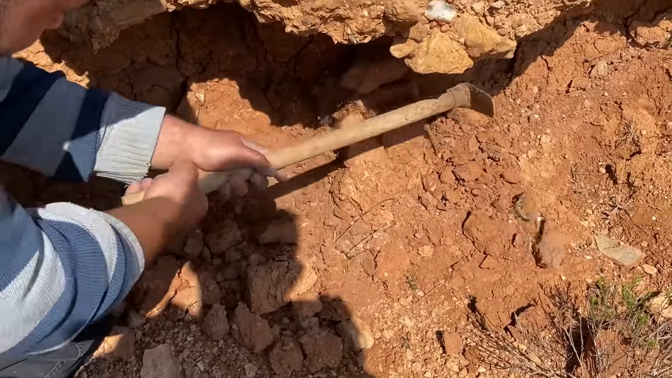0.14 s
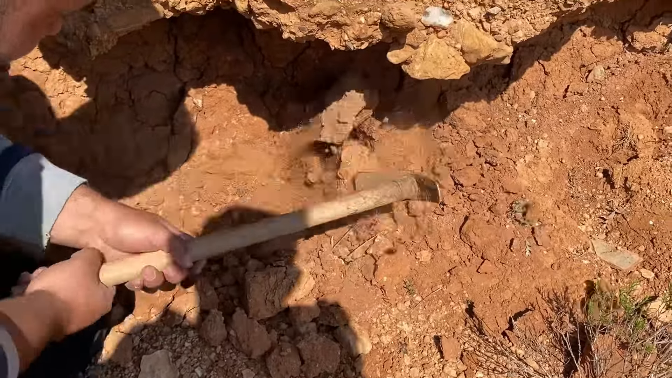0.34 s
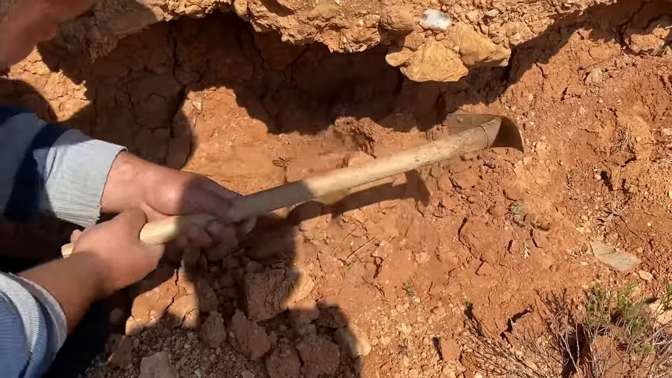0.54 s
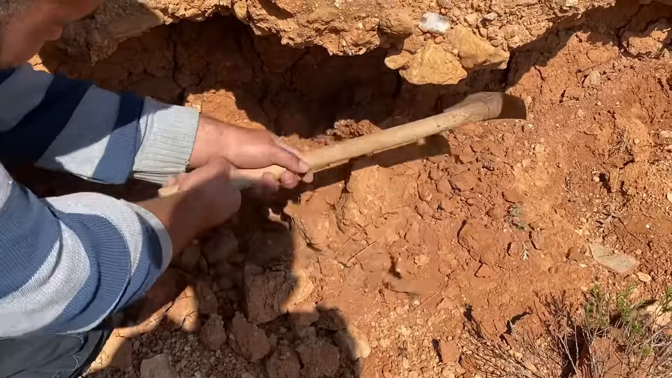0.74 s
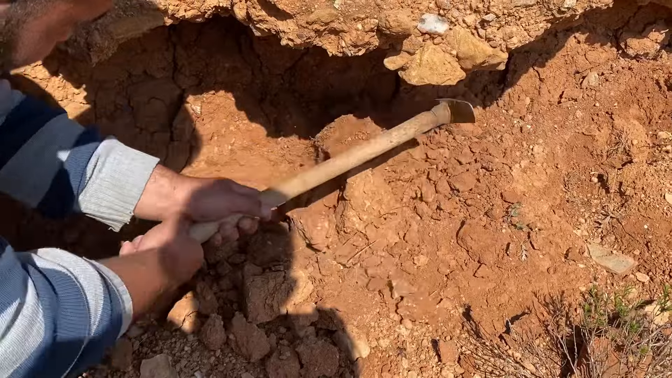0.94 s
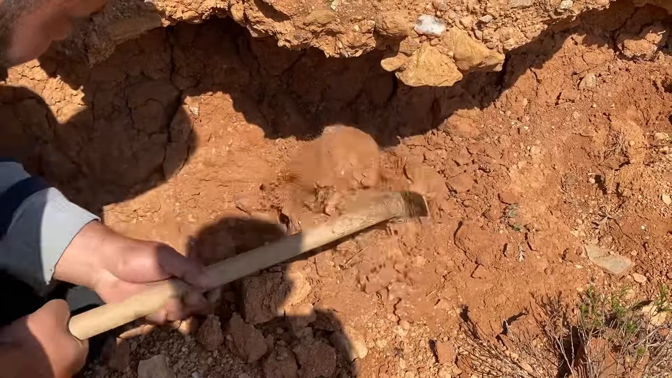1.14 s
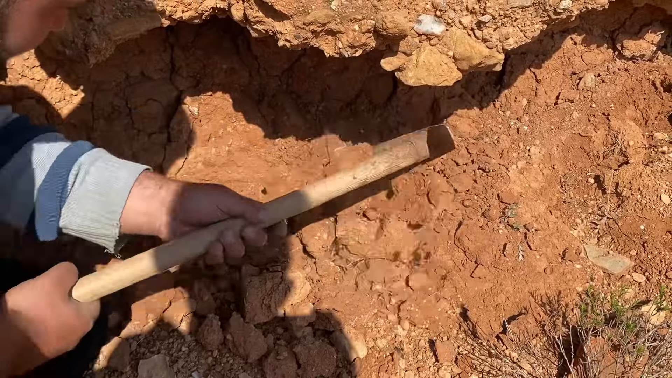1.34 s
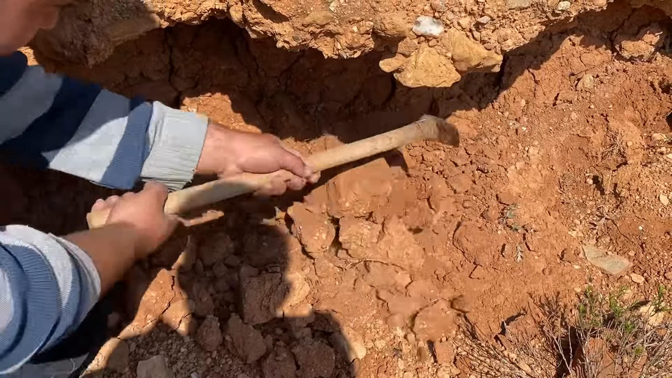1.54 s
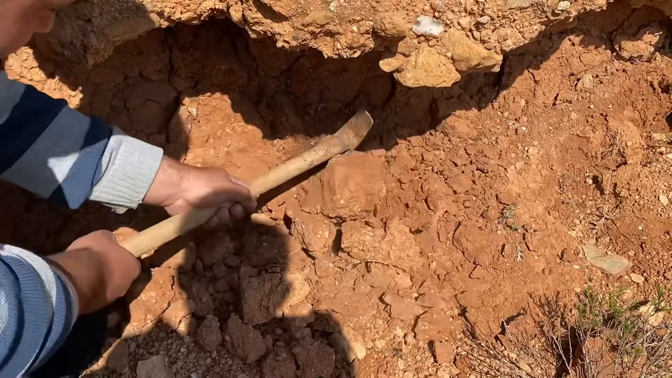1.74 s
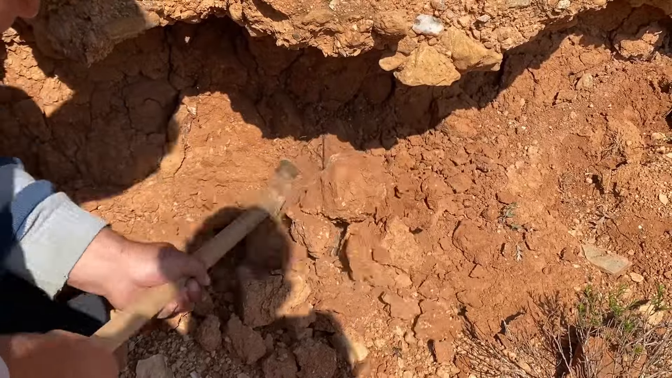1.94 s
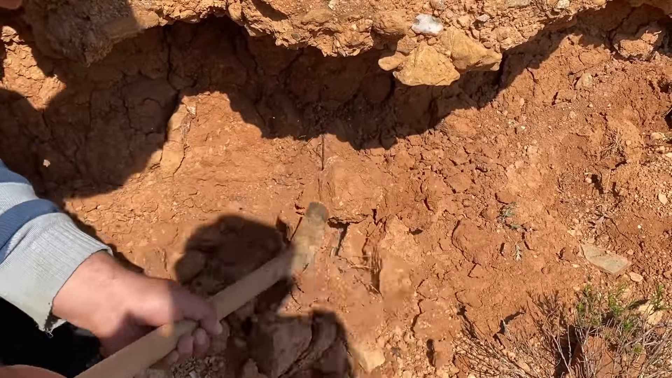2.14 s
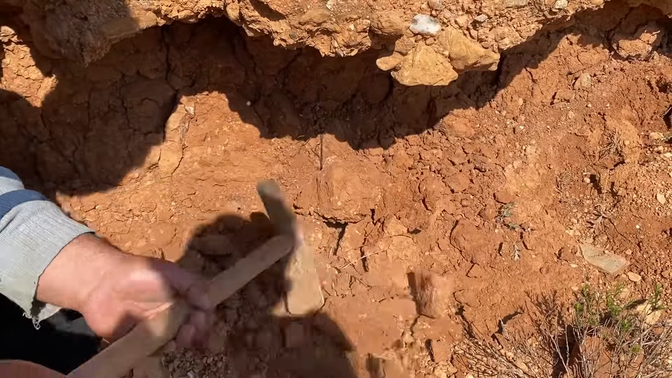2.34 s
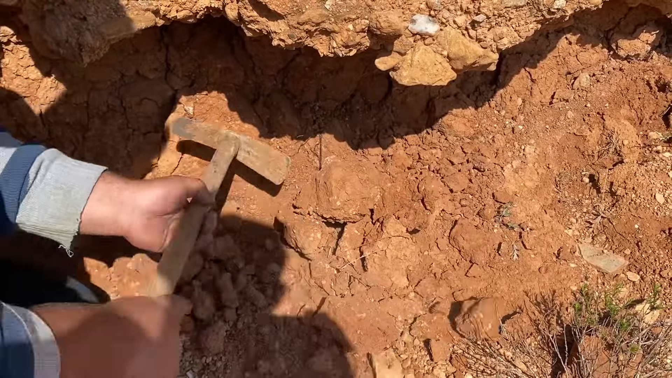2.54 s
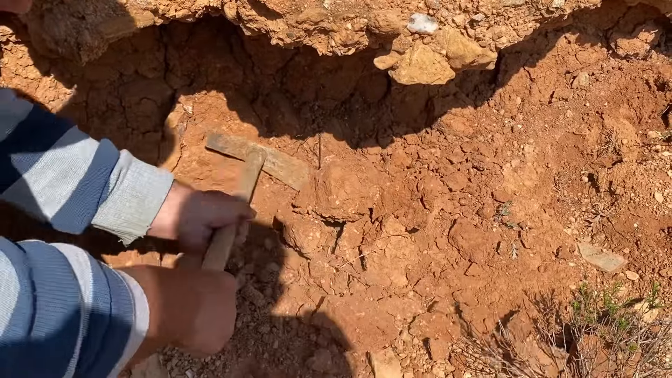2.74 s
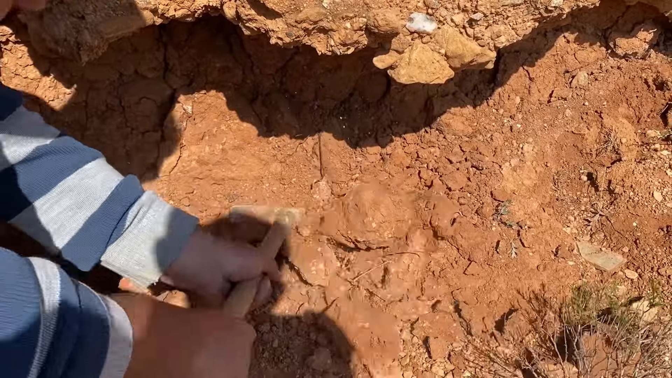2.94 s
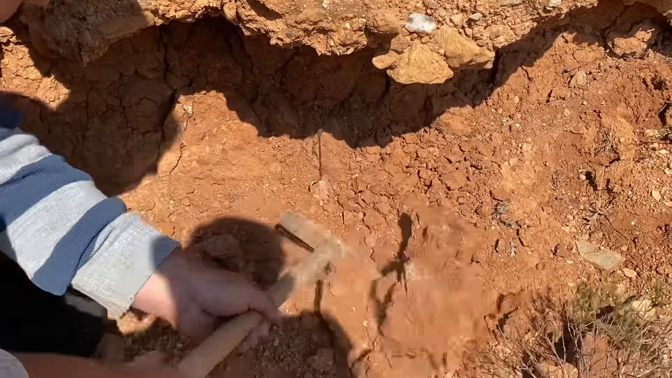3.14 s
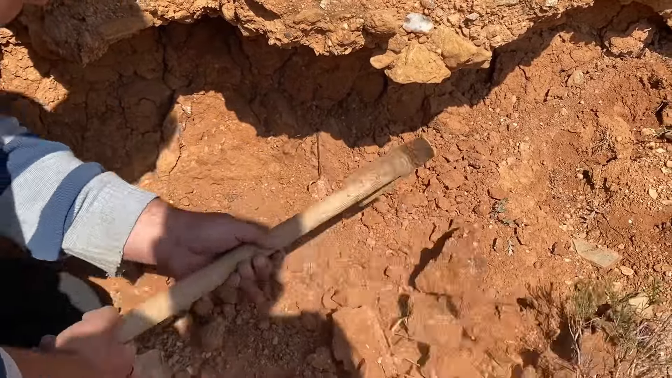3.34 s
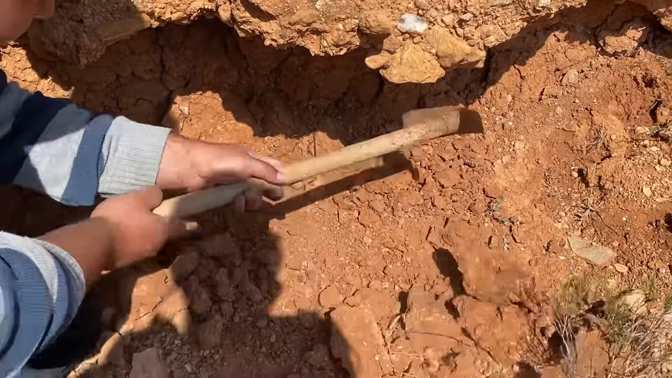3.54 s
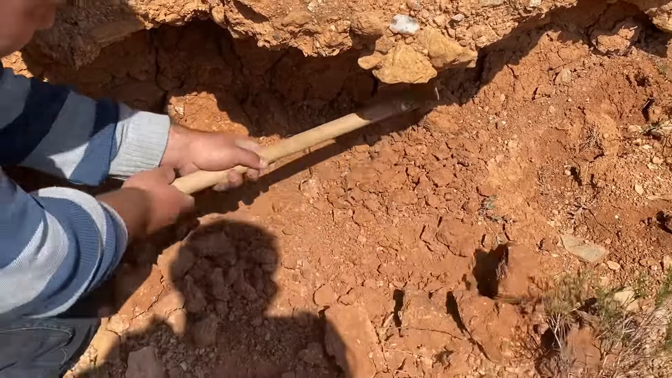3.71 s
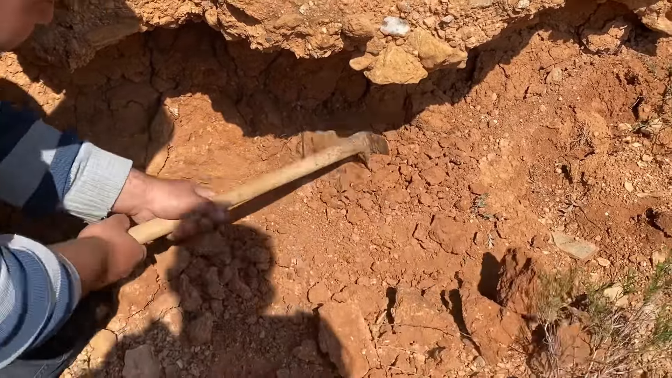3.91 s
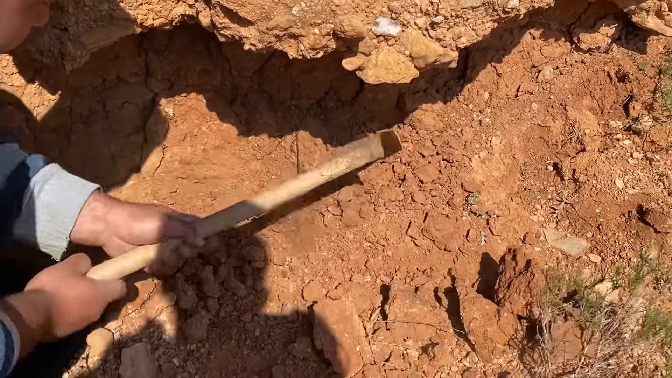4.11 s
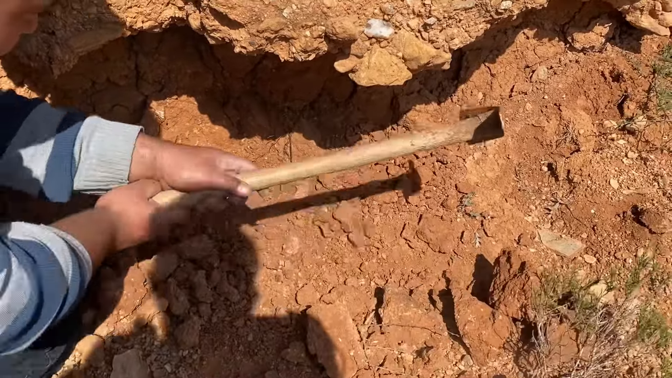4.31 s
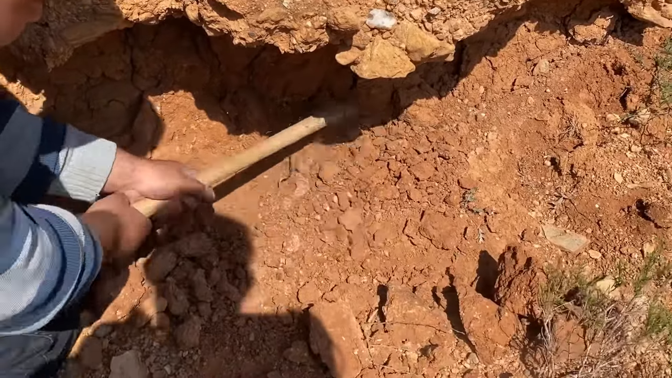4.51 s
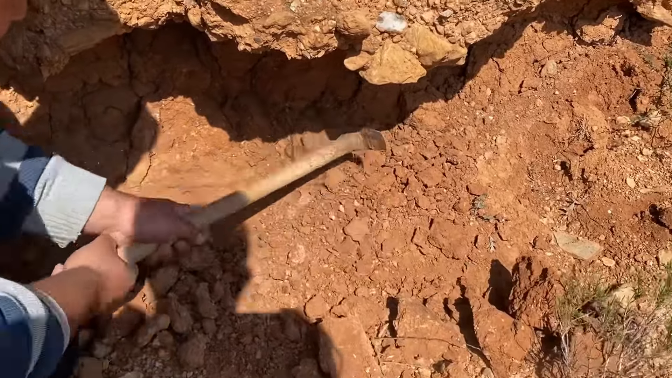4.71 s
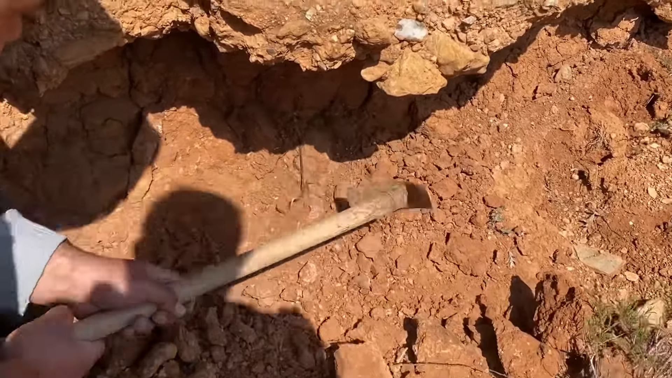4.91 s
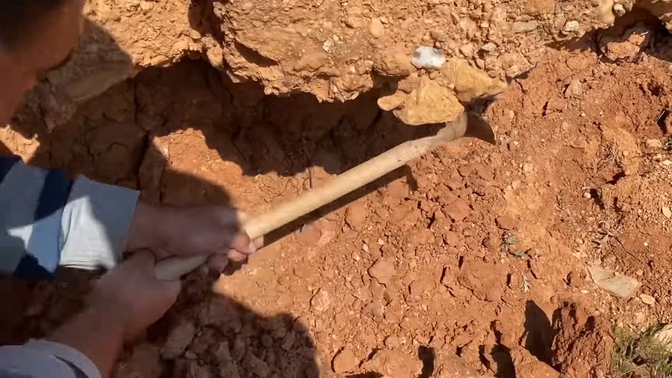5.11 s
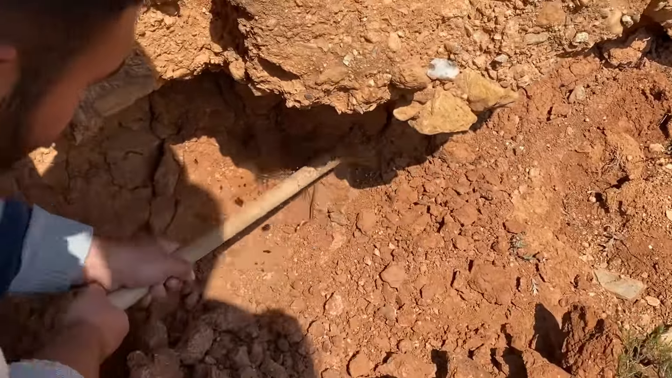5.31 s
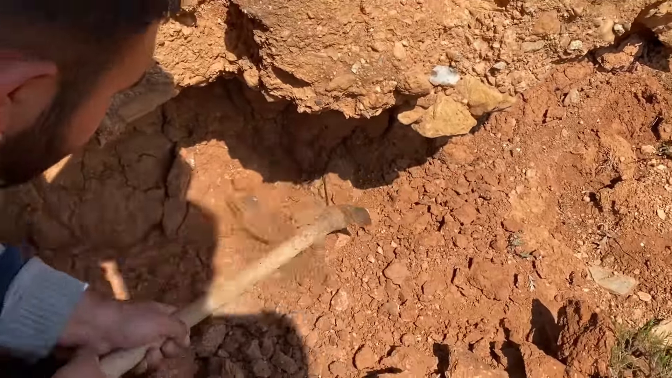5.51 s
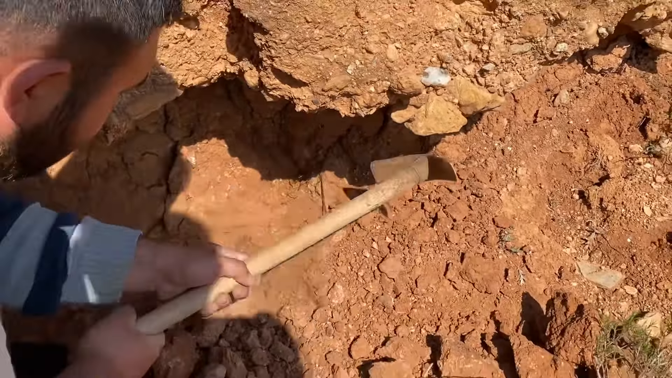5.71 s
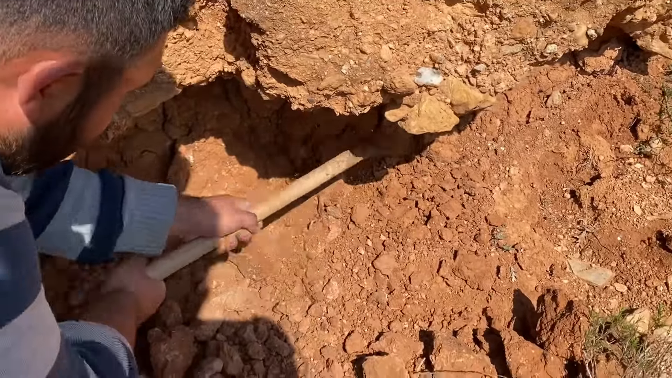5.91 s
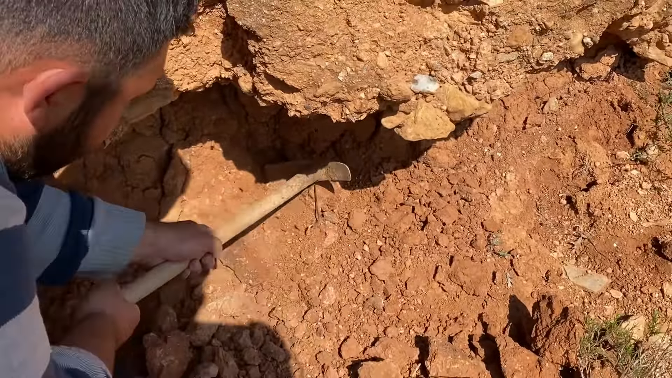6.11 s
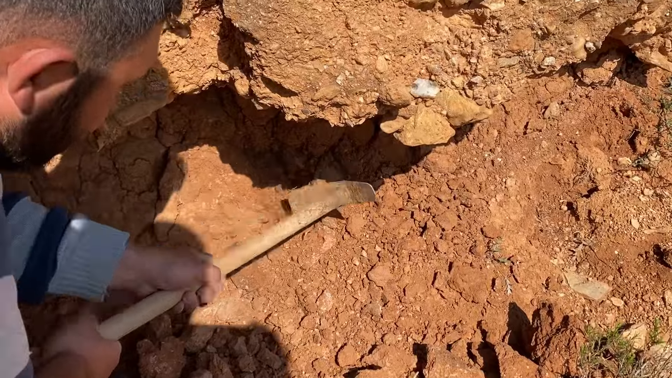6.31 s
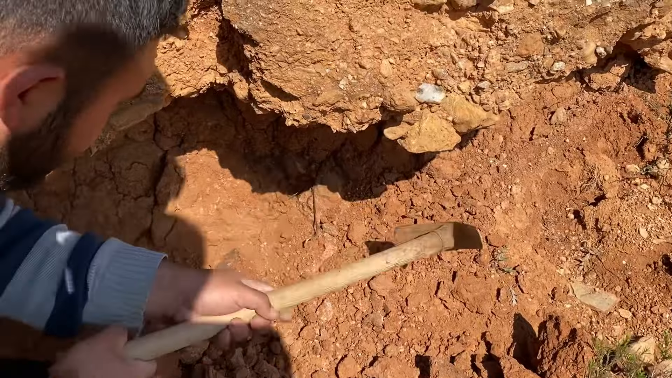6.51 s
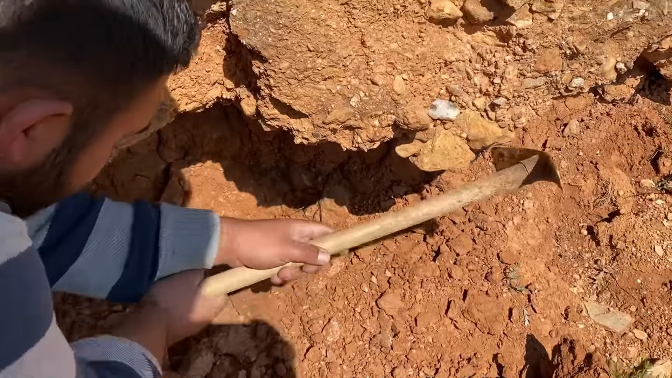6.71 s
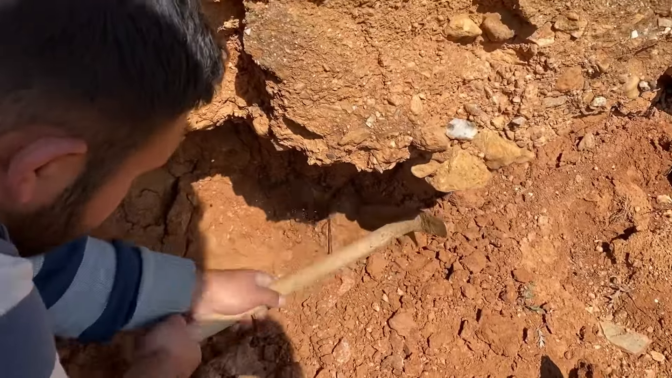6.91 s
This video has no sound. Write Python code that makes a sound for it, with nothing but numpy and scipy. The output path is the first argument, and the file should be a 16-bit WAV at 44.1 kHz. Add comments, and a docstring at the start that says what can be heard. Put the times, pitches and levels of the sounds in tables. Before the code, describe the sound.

Close up in the open air, an iron digging blade with a wooden handle chops unevenly into stony soil. Stones give short, damped clinks and cracks, the ground thumps, and gritty scrapes follow as the tool is pulled back. Midway the blows ease while crumbs and dust slide down the slope with a soft rumble, then harder strikes return and continue to the end.

```python
"""Mattock in a stony bank.

A short mattock chops into dry earth and is dragged back through it, close to two microphones.
Each stone rings the iron blade and knocks the handle; grit rubs the tool on the drag.
The ground thuds and loose earth trickles down the slope over a low rumble, like rolling clods."""
import sys
import numpy as np
from scipy import signal
from scipy.fft import rfft, irfft, next_fast_len
from scipy.io import wavfile
from scipy.ndimage import map_coordinates

SR = 44100
rng = np.random.default_rng(int(sys.argv[2]) if len(sys.argv) > 2 else 0)


def inscribe(sig):
    """Save sig as 16-bit PCM at rate SR to the path in sys.argv[1].

    A 1-D sig is mono; a 2-D sig holds one channel per row.
    Samples are clipped to [-1, 1] before scaling.
    """
    pcm = np.round(np.clip(np.atleast_2d(sig).T, -1, 1) * 32767)
    wavfile.write(sys.argv[1], SR, pcm.astype(np.int16))


N = 306495

# Levels in the tables are before the trims in the functions.
# Blade on stone. Each row: start in seconds, level in dB, handle, crack and edge in dB re blade,
# left minus right in dB, blade pitch in Hz, handle pitch in Hz, force T60 in seconds.
STONE_HITS = [(0.0266, -13, -9.5, -2.5, -20, 1, 2400, 503, 0.031),
              (0.1448, -25.5, -5, -16, -12, 0, 3300, 1380, 0.018),
              (0.165, -26, -9.5, -3, -28, -1, 2540, 1270, 0.031),
              (0.192, -23.5, -14, 0, -20, -3, 3280, 1090, 0.018),
              (0.2772, -17.5, -15.5, -8.5, -18, -1, 2120, 1330, 0.042),
              (0.3488, -39, -5.5, -17, -13, 1, 2530, 603, 0.022),
              (0.4907, -32.5, -10, -3, -21, -1, 1950, 510, 0.039),
              (0.5052, -34, -10, -14, -24, -1, 2190, 490, 0.1),
              (0.5402, -39, 0, -18, -8, 0, 1820, 510, 0.02),
              (0.5624, -40, -6, -15, -5, 1.5, 3700, 610, 0.044),
              (0.624, -47.5, 2, -17, -19, 1, 3420, 516, 0.0096),
              (0.7789, -7.5, -13, -27, -20, 0.5, 2660, 684, 0.019),
              (0.8393, -41, -8.5, 5, -9, 1, 2060, 560, 0.025),
              (1.0335, -31, -10, 3, -22, 0, 3210, 1430, 0.015),
              (1.05, -24.5, -8.5, 2.5, -30, -1, 2000, 1130, 0.034),
              (1.3279, -43, -26, -6, -2, 0.5, 1920, 361, 0.014),
              (1.4186, -37, -8, -6, -15, 1, 2200, 383, 0.023),
              (1.5046, -43.5, 1.5, 2, -12, 0, 2110, 353, 0.015),
              (1.5746, -18, -15, -11, -40, 0, 1930, 660, 0.026),
              (1.6062, -26.5, -5.5, -9, -22, 1, 2140, 670, 0.06),
              (1.6576, -25.5, -15, -22, -16, -1, 2580, 977, 0.027),
              (1.726, -24.5, -10, -24, -29, 0, 2080, 594, 0.012),
              (1.7597, -28, -11, -25, -27, 1, 3020, 1130, 0.022),
              (1.8071, -21.5, -9, -26, -14, 1, 3050, 1080, 0.038),
              (1.8312, -27, -2.5, -22, -33, 2, 2750, 620, 0.032),
              (1.9048, -27, -2.5, -17, -27, 9, 2780, 1300, 0.014),
              (2.0822, -34, -10, -18, -16, 7, 2150, 1010, 0.024),
              (2.2393, -36, -5.5, -24, -26, 7, 1700, 1350, 0.02),
              (2.3179, -35, -19, -10, -12.5, -2, 2060, 353, 0.054),
              (2.6682, -25.5, -14, -20, -27, -1, 1640, 625, 0.02),
              (2.7603, -28.5, 0, -18, -9.5, 1, 2800, 750, 0.026),
              (2.843, -18, -20, -27, -15, 1.5, 3270, 487, 0.055),
              (2.9093, -26.5, -26, -9, -20.5, 1, 1930, 598, 0.046),
              (3.161, -34, -14, 1, -8, -1, 2160, 1100, 0.018),
              (3.2586, -34, -9, -19, -23, -4, 2160, 1100, 0.017),
              (3.2881, -31.5, -8, -14, -7, 1, 1920, 401, 0.02),
              (3.5573, -28, -8.5, -4, -24, -2, 1680, 367, 0.024),
              (3.653, -30.5, -8, -7, -16, -2, 1760, 1210, 0.021),
              (3.7468, -21.5, -15, -2, -12, 2, 3230, 473, 0.019),
              (3.7504, -12, -11, -19, -18, 0, 2010, 696, 0.022),
              (3.7683, -17.5, -29, -22, -27, -1, 2540, 1360, 0.0092),
              (3.8394, -24, -7, -32, -13, 2, 3000, 1070, 0.047),
              (3.8855, -16.5, -8, -16, -10.5, 2, 3050, 1130, 0.01),
              (3.9165, -15, -15.5, -21, -7, 2, 3260, 840, 0.014),
              (3.9339, -25.5, -8, -17, -10, 2, 3020, 1250, 0.028),
              (3.9698, -21.5, -7, -26, -28, 2, 5100, 472, 0.027),
              (4.1859, -42.5, 4, -24, 3, -1, 2140, 420, 0.017),
              (4.433, -40, 6, -22, -21, -2, 1840, 353, 0.027),
              (4.4577, -2.5, -11.5, -42, -19, 1, 2730, 510, 0.011),
              (4.6002, -24, -11, -12, -0.5, 1, 3100, 1280, 0.0092),
              (4.6321, -29, -2, -14, -12.5, 1, 3120, 1060, 0.052),
              (4.6676, -24, -4.5, -18, -9, 0, 2840, 635, 0.012),
              (4.7458, -34.5, -0.5, 6.5, -29, 3, 2550, 1300, 0.015),
              (4.8758, -45, -3, -15, -12, -3, 1690, 586, 0.063),
              (4.95, -49.5, 0, -17, 2, 0, 1860, 670, 0.027),
              (5.0394, -48, 3, -8.5, -9, -5, 1500, 360, 0.081),
              (5.2052, -9.5, -9.5, -13, -12.5, 0.5, 1970, 655, 0.028),
              (5.2064, -14.5, -14, -12, -27, 1, 2970, 1400, 0.017),
              (5.2395, -30.5, -5, -3, -8, -1, 3250, 666, 0.019),
              (5.2867, -22, -15, -1, -12, 0, 2060, 353, 0.0086),
              (5.3155, -26, -33, -19, -6.5, 1, 2380, 1200, 0.017),
              (5.3658, -18, -18, -36, -4.5, 0, 3000, 1250, 0.014),
              (5.3924, -21, -10.5, -27, -11, 1, 2540, 1250, 0.035),
              (5.4209, -20, -14, -31, -33, 2, 2460, 1260, 0.016),
              (5.442, -20, -9, -32, -36, 2.5, 2420, 764, 0.036),
              (5.7739, -10, -5.5, -9, -19, -0.5, 3300, 1300, 0.025),
              (5.8186, -48, -11, -10, -10, 0.5, 2780, 810, 0.016),
              (5.846, -45, 0, -4, -0.5, -1, 1920, 382, 0.019),
              (5.9357, -14.5, -9, -16, -21, 0.5, 2240, 690, 0.032),
              (5.9577, -20.5, 1.5, -32, -18, 2, 2070, 323, 0.02),
              (6.126, -34.5, -11, -11, -35, 1, 3300, 606, 0.012),
              (6.1687, -39.5, -3.5, -1, -24, 1, 2300, 546, 0.024),
              (6.1852, -32, -8, -0.5, -36, 0, 2080, 436, 0.017),
              (6.2065, -34, -7, -8, -33, 3, 2030, 1240, 0.037),
              (6.351, -40.5, -9, -14, -30, -7, 5000, 482, 0.015),
              (6.6605, -15, -5, -8, -16, 0.5, 2250, 1220, 0.044),
              (6.778, -43.5, 1.5, -24, -25, -1, 1880, 597, 0.019),
              (6.8176, -40, 3, -28, -24, -3, 1780, 340, 0.018),
              (6.7952, -13, -9, -2.5, -4.5, 0, 2700, 1380, 0.025),
              (6.9052, -28, -12, -46, -54, -1, 2360, 630, 0.047)]
# Tool resonances. Each row: frequency in Hz, width before damping in Hz, gain in dB.
BLADE_MODES = [(1590, 140, -11.5), (2064, 190, -0.5), (2500, 190, -1.5), (2664, 397, -3), (2973, 300, -1.5),
               (3236, 124, 0), (4340, 25, -5.5), (4996, 59, -2.5), (5610, 26, -3.5)]
EDGE_MODES = [(6345, 170, 0), (7800, 49, 5), (9920, 99, 6), (10300, 51, -11), (11450, 71, -16),
              (12300, 97, -9), (12230, 82, 4.5), (13800, 25, -14), (14330, 100, -11.5)]
HANDLE_MODES = [(287, 310, 1), (531, 194, -1), (632, 116, -2), (852, 74, -1.5), (1085, 111, -1),
                (1367, 130, 1)]
# Blows and clods on the ground. Each row: start in seconds, level in dB, nominal pitch 10 ms in, in Hz,
# T60 in seconds, scuff in dB re swing.
THUDS = [(0.027, -32.5, 75, .1, -28), (0.152, -36.5, 215, 0.067, -20), (0.202, -30.5, 180, 0.088, -18),
         (0.27, -35.5, 227, 0.13, -20), (0.363, -42.5, 146, 0.12, -20), (0.498, -40, 73, 0.16, -10),
         (0.623, -43, 160, .11, -6), (0.739, -37, 68.5, 0.048, -20), (0.777, -29, 212, 0.069, -16),
         (1.061, -35, 234, 0.092, -27), (1.187, -24, 114, 0.076, -36), (1.233, -31, 85, 0.12, -19),
         (1.292, -27.5, 113, 0.034, -15), (1.395, -36, 199.5, 0.13, -14), (1.468, -37, 83.4, .1, -30),
         (1.5, -38, 116, .057, -13), (1.563, -31, 94, 0.098, -24), (1.601, -34.5, 245, 0.067, -15),
         (2.313, -37, 96, .078, -20), (2.626, -35, 71, .07, -33), (2.664, -39.5, 264, 0.06, -18),
         (2.759, -36, 83, .07, -20), (3.142, -39, 85, 0.074, -14), (3.257, -35.5, 102, 0.1, -8),
         (3.462, -34.5, 119, 0.075, -26), (3.683, -36.5, 86.6, .07, -20), (3.751, -22.5, 159, 0.076, -15),
         (3.966, -31.5, 184, 0.067, -21), (4.03, -30.5, 91, 0.082, -3), (4.133, -32, 75, .089, -11),
         (4.15, -30, 71, 0.11, -4.5), (4.179, -36.5, 165, 0.11, 1), (4.221, -37.5, 125, 0.11, -32),
         (4.373, -32.5, 119, 0.068, -12), (4.459, -19.5, 130, 0.082, -4.5), (4.586, -37, 217, 0.12, -20),
         (4.745, -37, 244, .075, -18), (4.794, -36, 123, .16, -28), (5.164, -39.5, 148, 0.058, -16),
         (5.209, -19.5, 235, 0.09, -24), (5.417, -32.5, 221, 0.086, -24), (5.584, -41, 132, .07, -10),
         (5.773, -29, 254, 0.052, 1), (5.848, -41.5, 79.5, 0.1, -17), (5.908, -40, 90, .07, -33),
         (5.938, -31, 143, 0.22, -28), (5.957, -22, 235, 0.12, -20), (6.357, -42, 88, 0.068, -24),
         (6.603, -31, 81, 0.21, -42), (6.643, -19.5, 78, 0.097, -33), (6.664, -26, 119, 0.057, -10),
         (6.739, -48, 95, 0.054, -25), (6.802, -15, 134, 0.085, -13), (6.908, -33, 74, 0.16, -16)]
# Drag strokes. Each row: start and end in seconds, level in dB, change over the stroke in dB,
# edge and handle in dB re blade.
SCRAPES = [(0.13, 0.164, -43.5, 6, -4.5, -2.5), (0.2, 0.223, -39, 7, -1.5, -6),
           (0.294, 0.291, -43.5, -24, -4, 10.5), (0.98, 1.002, -52, 6, -17, 1.5),
           (1.069, 1.13, -36, -15, -3, -4.5), (1.6, 1.62, -39.5, -14, -7, -3),
           (1.675, 1.793, -41.5, -9, -3.5, 1), (1.802, 1.878, -37.5, -9, -22, 2),
           (1.916, 2.014, -38, -10.5, -12, -0.5), (2.102, 2.139, -41.5, -2.5, -6, -2),
           (3.556, 3.574, -44, 3.5, -5, 3), (3.658, 3.692, -47, -11, -4, 5.5),
           (3.776, 3.872, -39.5, 2.5, -10, 2), (3.89, 3.987, -38, -9, -2, -0.5),
           (4.142, 4.185, -58, 3, 3, 5.5), (4.48, 4.63, -42.5, -2.5, -7, 0),
           (4.644, 4.729, -40, -10, -1.5, 6), (5.25, 5.335, -37, -15, -4.5, -1.5),
           (5.351, 5.458, -37, -6.5, -4, -1.5), (5.481, 5.499, -49, 2, -3, -2),
           (5.567, 5.586, -55.5, 7, -3, 1), (5.968, 6.01, -46, 9.5, -5, 2),
           (6.114, 6.224, -60.5, 7, -4.5, 2)]
# Running earth. Each row: time in seconds, grit, crumb and dust levels in dB.
TRICKLE_LEVELS = [(0.0, -55, -71, -72), (0.43, -57, -59, -60), (0.6, -62.5, -64, -66),
                  (0.79, -63, -63, -81), (1.14, -54, -54, -53.5), (1.45, -61.5, -80, -68),
                  (1.6, -61, -70, -84), (1.78, -46, -52.5, -61), (2.05, -54, -52, -60.5),
                  (2.69, -51.5, -57.5, -54.5), (2.92, -50, -46.5, -59), (3.16, -50, -50, -61),
                  (3.35, -50.5, -54.5, -47), (3.62, -50.5, -73, -56.5), (3.81, -49, -56.5, -56),
                  (3.95, -56.5, -46.5, -61), (4.2, -60, -57.5, -60), (4.41, -63, -52.5, -59),
                  (4.59, -52, -56, -72), (4.76, -63, -63.5, -69), (4.99, -63.5, -58.5, -68),
                  (5.25, -60, -64, -87), (5.38, -54, -49, -63), (5.55, -64, -61, -69.5),
                  (6.48, -67.5, -62.5, -88), (6.95, -63.5, -59, -78)]
# Low rumble. Each row: time in seconds, level in dB.
RUMBLE_LEVELS = [(0.0, -58), (0.21, -48), (0.31, -55.5), (0.83, -62), (1.06, -60), (1.35, -44.5),
                 (1.55, -46), (1.97, -57.5), (2.84, -51.5), (3.31, -42.5), (3.56, -51.5), (3.74, -50.5),
                 (3.91, -46.5), (4.72, -55.5), (4.9, -58.5), (5.13, -61), (5.36, -48), (5.57, -60),
                 (5.79, -67), (5.94, -53), (6.41, -61.5), (6.6, -49.5), (6.76, -45), (6.95, -50)]
# Noise spectra. Each row: frequency in Hz, gain in dB.
CRACK_SPECTRUM = [(800, -55), (2500, -5), (4000, 7.5), (6000, -5.5), (10000, -4.5), (15000, -23)]
GRIT_SPECTRUM = [(300, -9), (1000, -0.5), (2500, 0), (5000, -2), (8000, -7.5), (11000, -9.5), (17000, -49)]
CRUMB_SPECTRUM = [(100, -17), (250, 0.5), (600, 4), (1200, -5.5), (3000, -15)]
DUST_SPECTRUM = [(3000, -48), (7000, -15), (10000, -3), (14000, -4), (17000, -9)]
RUMBLE_SPECTRUM = [(20, -39), (40, 0), (65, 2), (110, -4), (200, -7), (400, -19.5), (900, -82)]
# Two fixed treble dips, near 8 and 13 kHz. Each row: centre in Hz, width in Hz, depth from 0 to 1.
TREBLE_DIPS = [(8100, 150, 0.42), (12900, 2730, 0.41)]
# Phase between microphones. Each row: frequency in Hz, left lead in radians.
MIC_LEAD = [(0, -0.5), (780, 0.5), (1720, 0.56), (2930, 0.74), (6800, 1), (8700, -4), (9730, -5.5),
            (10700, -6.5), (11600, -9), (12800, -10.5), (13300, 1), (14600, -21), (15200, -21.5),
            (16400, -6)]
# Balance between microphones. Each row: frequency in Hz, left minus right in dB.
MIC_BALANCE = [(60, 3.5), (110, 1), (200, 0.5), (380, 0.5), (700, 0.5), (1290, 4.5), (2380, 1), (4400, 4),
               (8120, 1.5), (15000, 0.5)]


def stone_hits():
    """A grinding burst of force rings blade, edge and handle, and cracks the stone."""
    out, t = np.zeros((2, N + SR)), np.arange(SR // 8) / SR
    bury_db, damping_per_db = -15, 0.18  # harder blows bury the tool; the earth damps it more
    hits = [*STONE_HITS, *pebbles()]
    for start_s, level_db, handle_db, crack_db, edge_db, pan_db, blade_hz, handle_hz, t60_s in hits:
        damping = 1.68 + damping_per_db * max(level_db - bury_db, 0)
        force = rng.standard_normal(len(t)) * amp(-60 * t / t60_s) * (1 - np.exp(-t / 0.0013))
        force[SR // 1000] += 2.8  # hardest instant
        stone = modes([(blade_hz, 170 * damping, -5)])
        iron = modes(BLADE_MODES, damping, scatter_db=3.62, favoured_hz=blade_hz)
        grip_mode = (handle_hz, 110, 1.5)
        wood = modes(HANDLE_MODES + [grip_mode], damping, scatter_db=4.96, favoured_hz=handle_hz)
        blade = filtered(force, lambda hz: iron(hz) + stone(hz))
        crack = shaped(force, CRACK_SPECTRUM)
        handle = filtered(force, lambda hz: wood(hz) * dispersion(hz, 1.228, low_hz=155, high_hz=2630))
        edge = filtered(force, modes(EDGE_MODES, damping, scatter_db=1.3))
        click = 0.12 * damping * np.diff(force, prepend=0)
        hit = (unit_peak(blade)
               + amp(crack_db + 2.5) * unit_peak(crack)
               + amp(handle_db + 7) * unit_peak(handle)
               + amp(edge_db + 15.5) * unit_peak(edge + click))
        out[:, round(start_s * SR):][:, :len(t)] += amp(level_db - 4 + left_right(pan_db / 2)) * hit
    return out[:, :N]


def thuds():
    """Low, uneven ground thuds that fall quickly in pitch; clods break with a dull scuff."""
    out, t = np.zeros(N + SR), np.arange(SR // 4) / SR
    for start_s, level_db, pitch_hz, t60_s, scuff_db in THUDS:
        jitter = np.interp(t, np.arange(64) * 0.00335, rng.standard_normal(64))
        fall_power = 0.45 + 0.082 * np.log2(pitch_hz / 120)  # higher thuds fall further
        glide_hz = pitch_hz * ((t + 0.0032) / 0.01344) ** -fall_power * (1 + 0.31 * jitter)
        attack = 1 - np.exp(-(t / 0.0044) ** 2)
        decay = amp(-60 * (t / t60_s) ** 1.93)  # ends more abruptly than an exponential
        swing = np.sin(2 * np.pi * np.cumsum(glide_hz) / SR) * attack * decay
        burst = rng.standard_normal(len(t)) * amp(-60 * t / t60_s)
        scuff = filtered(burst, modes([(510, 180, 0)]))
        thud = unit_peak(swing) + amp(scuff_db) * unit_peak(scuff)
        out[round(start_s * SR):][:len(t)] += amp(level_db) * thud
    return out[:N]


def scrapes():
    """Grit rubs the dragged blade in jerks and drives the whole tool, slightly left."""
    bite_db_per_s, lift_db_per_s = 531, 1011
    blade, edge, handle = np.zeros((3, N))
    t = np.arange(N) / SR
    for start_s, end_s, start_db, change_db, edge_db, handle_db in SCRAPES:
        progress = np.clip((t - start_s) / max(end_s - start_s, 0.005), 0, 1)
        fade_db = bite_db_per_s * np.maximum(start_s - t, 0) + lift_db_per_s * np.maximum(t - end_s, 0)
        level_db = start_db + change_db * progress - fade_db
        blade += amp(level_db)
        edge += amp(level_db + edge_db)
        handle += amp(level_db + handle_db)
    rub = grains(rate_per_s=1600, spread_db=3.8, noise_share=0.4, decay_s=0.001) * jerks(rate_per_s=60)
    ring = lambda table: unit_rms(filtered(rub, modes(table, damping=1.17)))
    tool = blade * ring(BLADE_MODES) + edge * ring(EDGE_MODES) + handle * ring(HANDLE_MODES)
    return tool * amp([[-3.5], [-5.5]])


def pebbles(count=60):
    """Loose stones tick on the tool, denser where more grit runs; rows as in STONE_HITS."""
    grit_db = envelopes(TRICKLE_LEVELS)[0]
    flow = np.cumsum(amp(grit_db))
    when, blade_draw, handle_draw = rng.random((count, 3)).T
    onset = np.searchsorted(flow, when * flow[-1])
    over_grit_db, handle_db, crack_db, edge_db, pan_db = rng.normal(
        loc=[12, -12, -15, -22, 1.5], scale=[3, 5, 5, 5, 3], size=(count, 5)).T
    blade_hz, handle_hz = 1700 * 2.64 ** blade_draw, 360 * 2.73 ** handle_draw
    t60_s = np.full(count, 0.022)
    return np.column_stack([onset / SR, grit_db[onset] + over_grit_db, handle_db, crack_db, edge_db,
                            pan_db, blade_hz, handle_hz, t60_s])


def trickle():
    """Sliding grit and dust hiss and tick together; larger crumbs patter lower."""
    grit_db, crumb_db, dust_db = envelopes(TRICKLE_LEVELS)
    flow = jerks(rate_per_s=45)
    fines = flow * grains(rate_per_s=700, spread_db=6.6, noise_share=0.49, decay_s=0.0018)
    lumps = flow * grains(rate_per_s=140, spread_db=3.5, noise_share=0.39, decay_s=0.0099)
    return (amp(grit_db + 2.5) * unit_rms(shaped(fines, GRIT_SPECTRUM))
            + amp(dust_db + 1.5) * unit_rms(shaped(fines, DUST_SPECTRUM))
            + amp(crumb_db) * unit_rms(shaped(lumps, CRUMB_SPECTRUM)))


def rumble():
    """Low rumble of soft, tumbling bumps, like rolling clods."""
    level_db, = envelopes(RUMBLE_LEVELS)
    bumps = grains(rate_per_s=45, spread_db=2.5, noise_share=0.35, decay_s=0.003)
    lows = lambda hz: amp(log_interp(RUMBLE_SPECTRUM, hz)) * dispersion(hz, 1.474, low_hz=39, high_hz=807)
    return amp(level_db + 5) * unit_rms(filtered(bumps, lows))


def bank_echo(x, delay_s=0.0015, t60_s=0.041):
    """The rough earth wall adds a faint, short scatter, different at each microphone."""
    t = np.arange(SR // 40) / SR
    scatter = rng.standard_normal((2, len(t))) * amp(-60 * t / t60_s) * (t > delay_s)
    scatter /= np.linalg.norm(scatter[0])
    return x + amp(-11.5) * signal.fftconvolve(x, scatter, axes=1)[:, :N]


def modes(table, damping=1, scatter_db=0, favoured_hz=None):
    """Causal response of resonances with scattered gains; a blow favours those near its pitch."""
    offset_db = scatter_db * rng.standard_normal(len(table))
    if favoured_hz:
        offset_db -= 10.7 * np.abs(np.log2(np.array(table)[:, 0] / favoured_hz))
    return lambda hz: sum((-1) ** k * amp(gain_db + offset_db[k]) * 1j * hz * width_hz
                          / (mode_hz ** 2 - hz ** 2 + 1j * hz * width_hz * damping)
                          for k, (mode_hz, width_hz, gain_db) in enumerate(table))


def dispersion(hz, cycles, low_hz, high_hz):
    """All-pass response: within the band, lower frequencies arrive later."""
    ratio = np.clip(hz, low_hz, high_hz) / high_hz
    return np.exp(-2j * np.pi * cycles * (np.log(ratio) - np.minimum(hz / high_hz, 1)))


def grains(rate_per_s, spread_db, noise_share, decay_s):
    """Noisy ticks of random size and pan over steady noise; stereo, rms 1."""
    onsets = rng.random(N) < rate_per_s / SR
    sizes = onsets * amp(spread_db * np.minimum(rng.exponential(size=N), 3.5))
    pan = amp(left_right(2.4 * rng.standard_normal(N)))
    decay = np.exp(-np.arange(SR // 40) / SR / decay_s)
    ticks = signal.fftconvolve(sizes * pan, decay[None], axes=1)[:, :N] * rng.standard_normal(N)
    return unit_rms(np.sqrt(1 - noise_share) * unit_rms(ticks) + np.sqrt(noise_share) * stereo_noise())


def stereo_noise(correlation=0.92):
    """White noise, mostly shared by both channels."""
    mid, side = rng.standard_normal((2, N))
    angle_rad = np.arccos(correlation) / 2
    return np.cos(angle_rad) * mid + np.sin(angle_rad) * left_right(side)


def jerks(rate_per_s, depth_db=1.2):
    """Smooth random gain."""
    knots = rng.standard_normal(int(N * rate_per_s / SR) + 4)
    return amp(depth_db * map_coordinates(knots, [np.arange(N) * rate_per_s / SR]))


def filtered(x, response):
    """Apply a complex frequency response."""
    length = x.shape[-1]
    padded = next_fast_len(length + 4096)
    return irfft(rfft(x, padded) * response(np.fft.rfftfreq(padded, 1 / SR)), padded)[..., :length]


def shaped(x, spectrum):
    """Filter by (Hz, dB) points."""
    return filtered(x, lambda hz: amp(log_interp(spectrum, hz)))


def log_interp(points, hz):
    """Interpolate (Hz, value) points on a log axis."""
    knots_hz, values = np.transpose(points)
    return np.interp(np.log(hz + 1), np.log(knots_hz + 1), values)


def envelopes(rows):
    """One value per sample for each column after the time."""
    times_s, *columns = np.transpose(rows)
    return [np.interp(np.arange(N) / SR, times_s, column) for column in columns]


def left_right(x):
    """+x left, -x right."""
    return np.outer([1, -1], x)


def amp(db):
    return 10 ** (np.asarray(db) / 20)


def unit_rms(x):
    return x / np.sqrt(np.mean(x ** 2) + 1e-20)


def unit_peak(x):
    return x / np.abs(x).max()


def scene():
    """Tool and ground in front of the bank; loose earth and low rumble around them."""
    return bank_echo(stone_hits() + scrapes() + thuds()) + trickle() + rumble()


def record(dry):
    """Two fixed treble dips and band limits; the spaced microphones differ in phase and level."""
    bass_cut_hz, rolloff_hz, top_hz = 45, 14900, 16700

    def response(hz):
        dips = np.prod([1 - depth * np.exp(-((hz - centre_hz) / width_hz) ** 2)
                        for centre_hz, width_hz, depth in TREBLE_DIPS], axis=0)
        bass_cut = hz ** 2 / (hz ** 2 + bass_cut_hz ** 2)
        treble_cut = amp(-25 * np.maximum(hz - rolloff_hz, 0) / 1100) * (hz < top_hz)
        phase = np.exp(1j * left_right(log_interp(MIC_LEAD, hz) / 2))
        balance = amp(left_right(log_interp(MIC_BALANCE, hz) / 2 - 0.6))
        return dips * bass_cut * treble_cut * phase * balance
    return filtered(dry, response)


dry = scene()
out = record(dry)
inscribe(out)
```